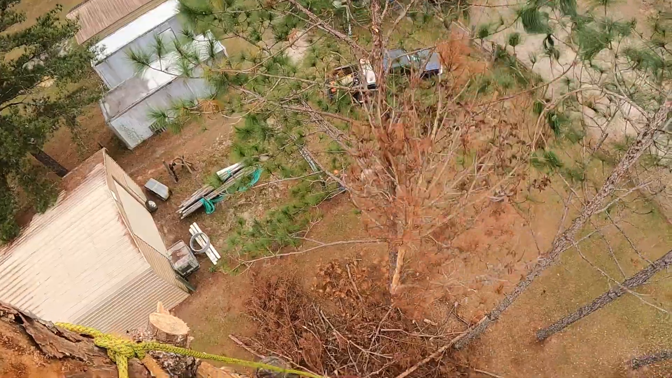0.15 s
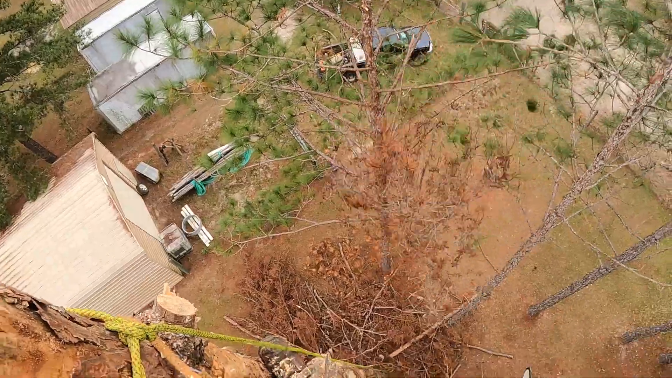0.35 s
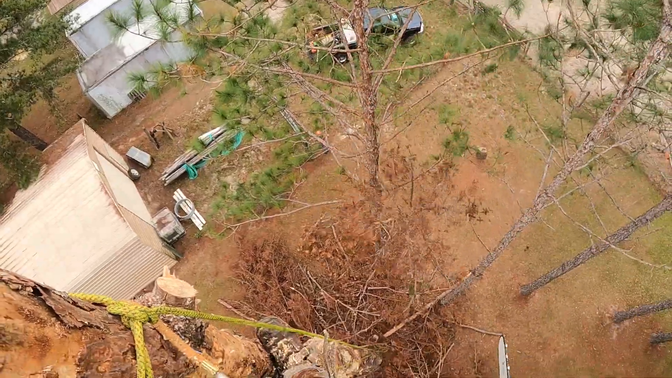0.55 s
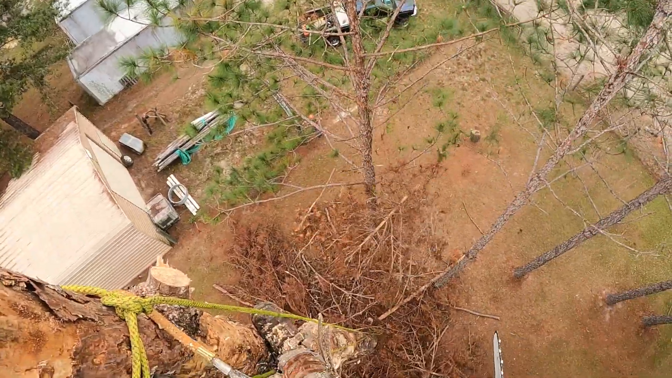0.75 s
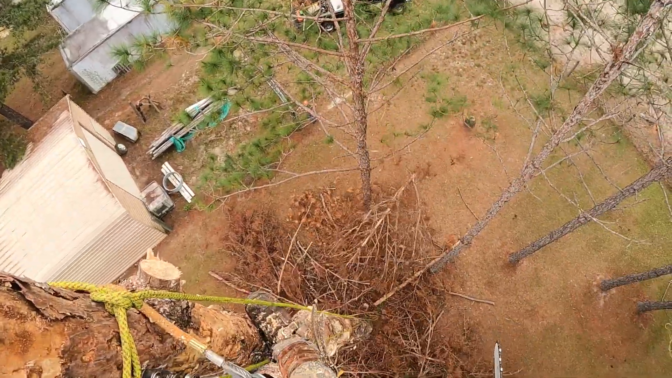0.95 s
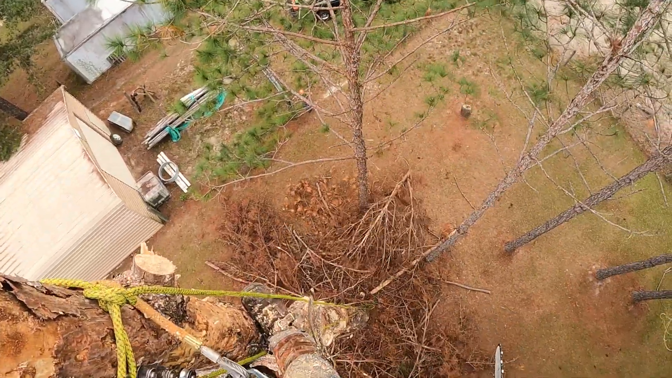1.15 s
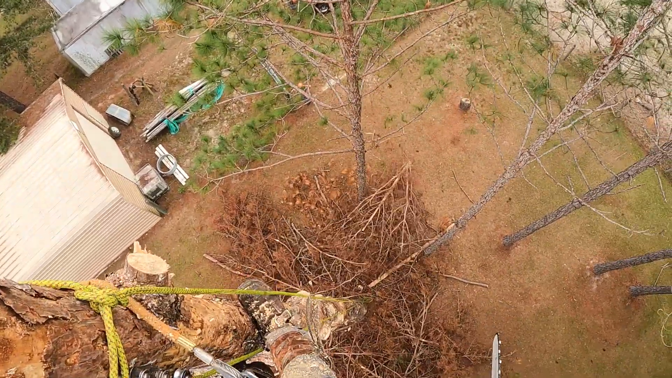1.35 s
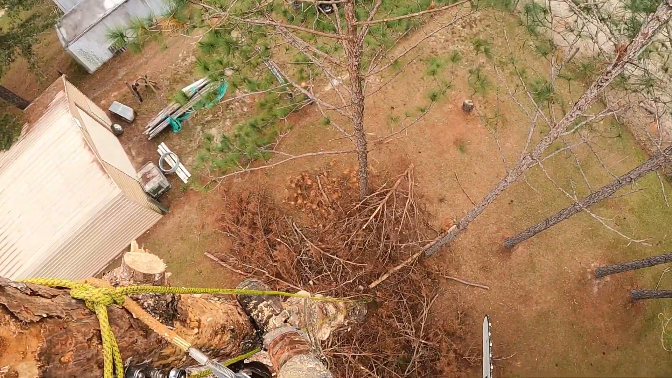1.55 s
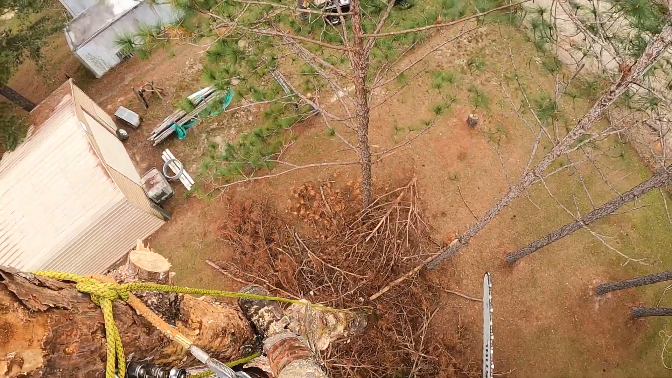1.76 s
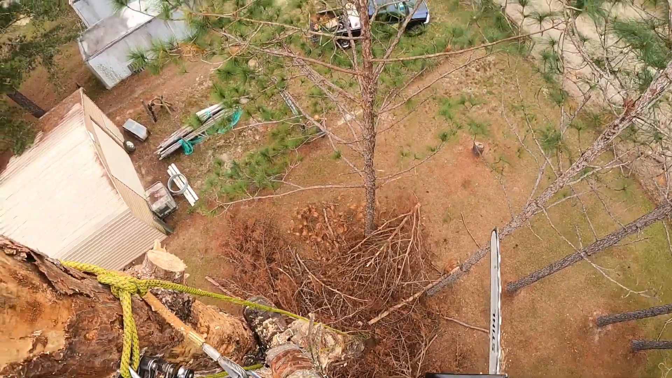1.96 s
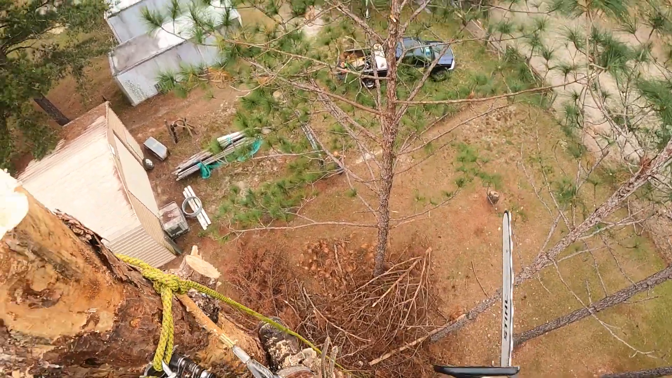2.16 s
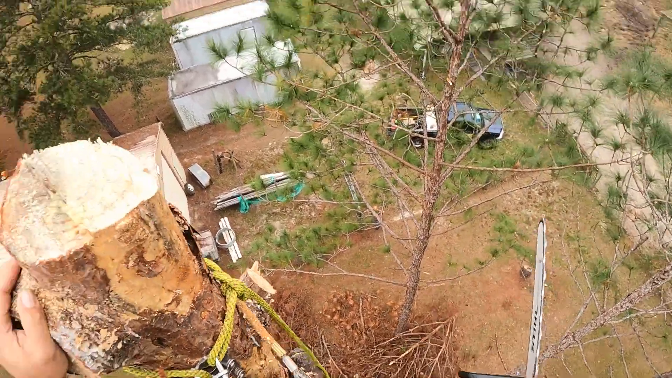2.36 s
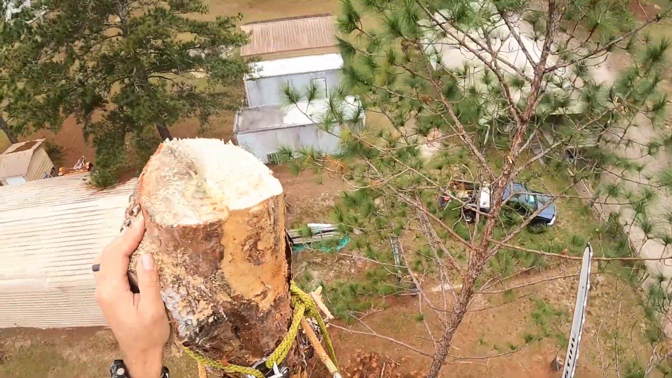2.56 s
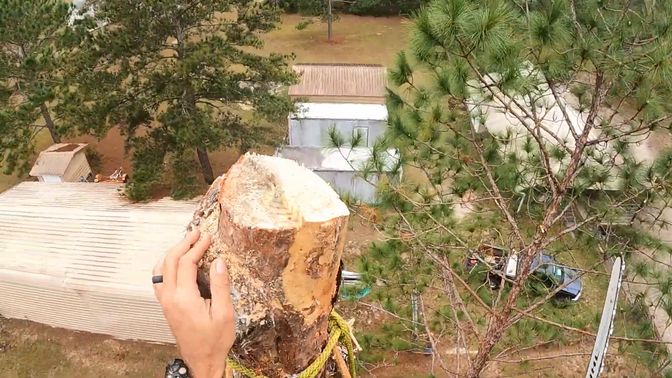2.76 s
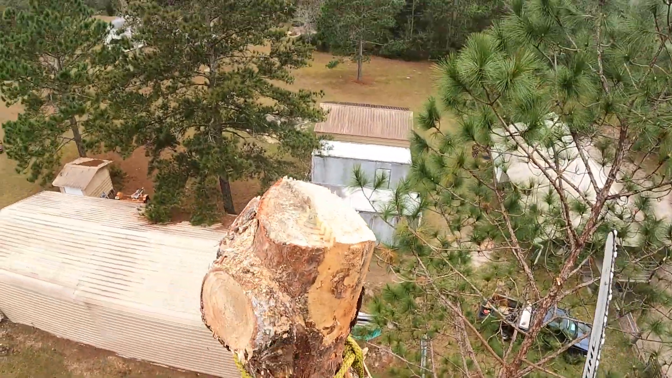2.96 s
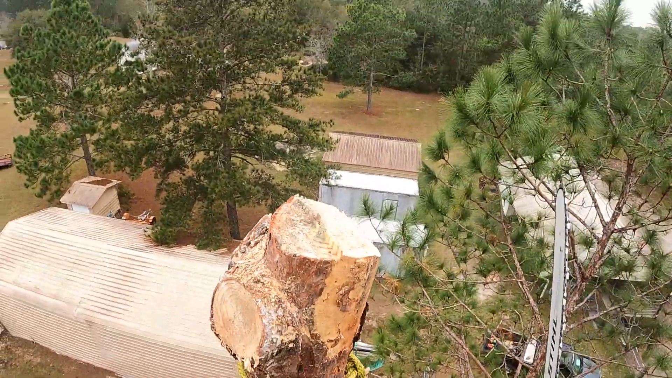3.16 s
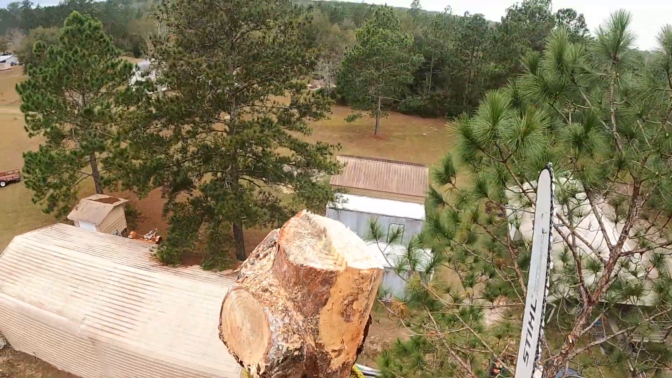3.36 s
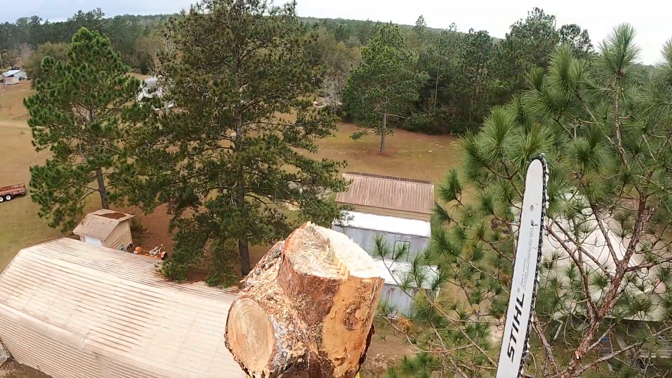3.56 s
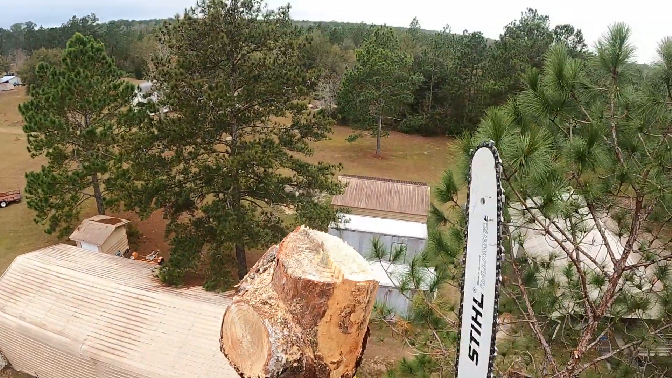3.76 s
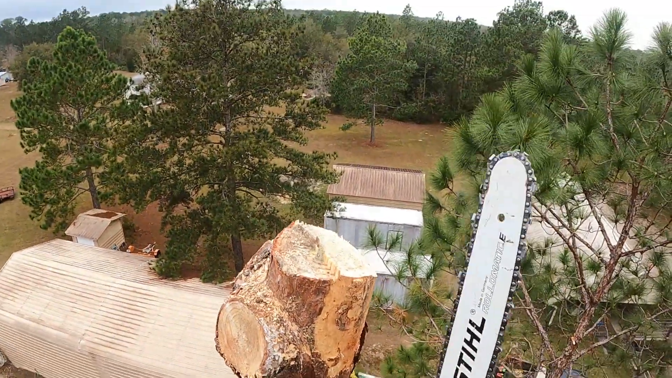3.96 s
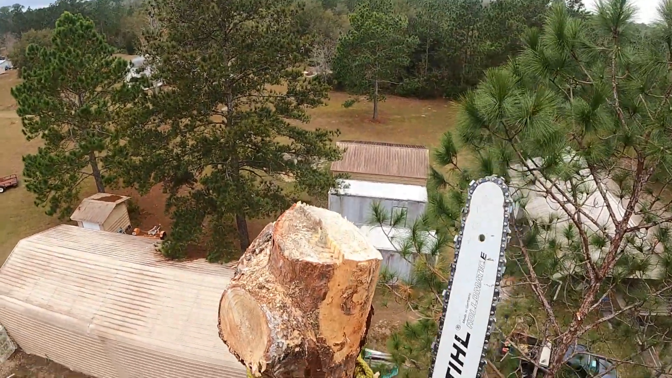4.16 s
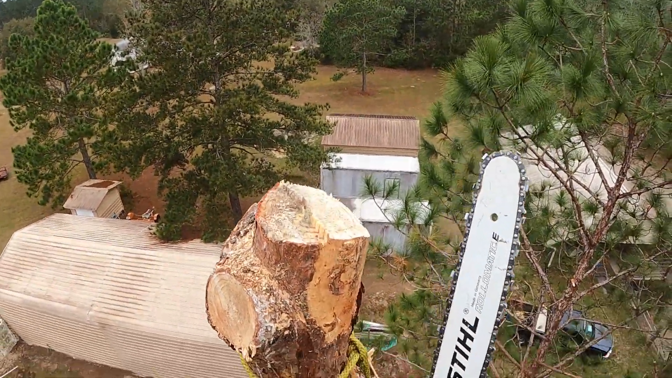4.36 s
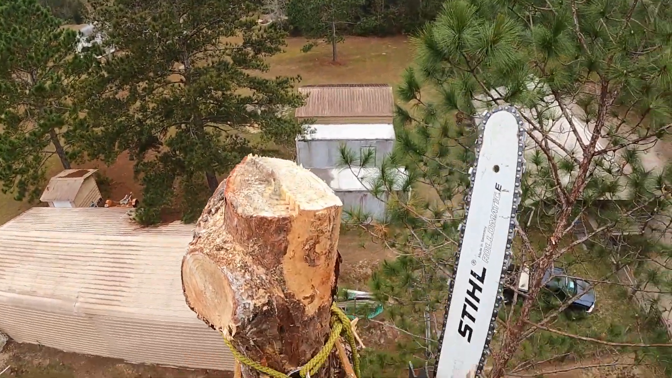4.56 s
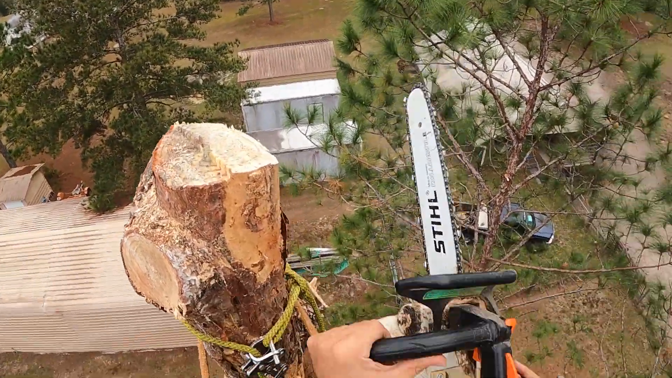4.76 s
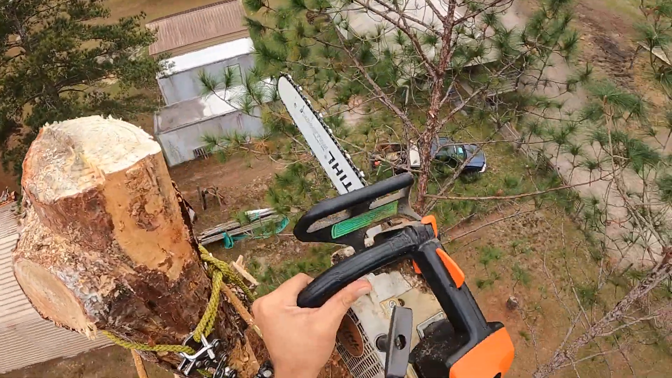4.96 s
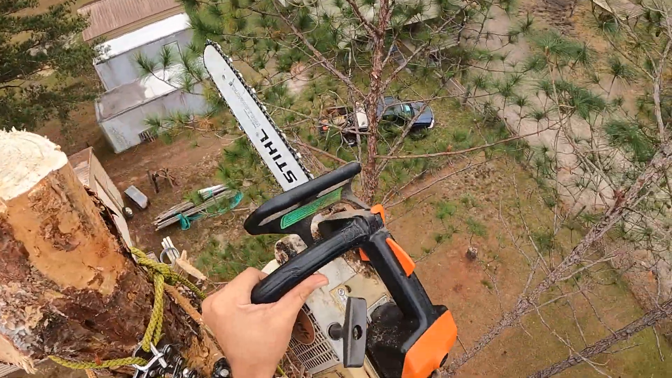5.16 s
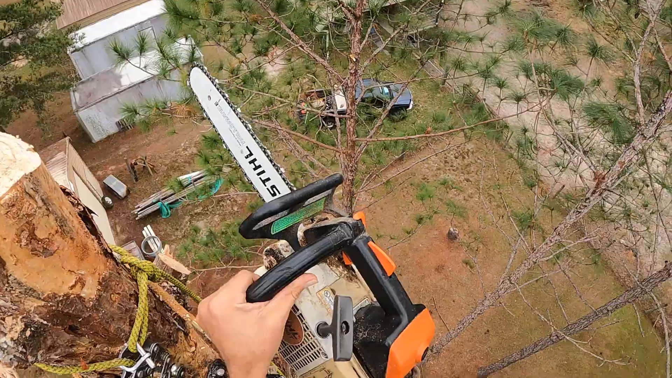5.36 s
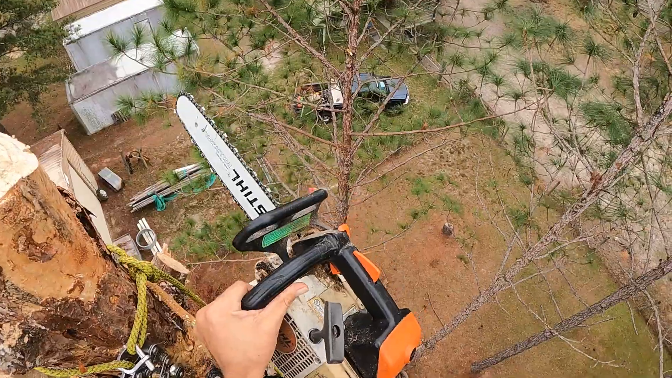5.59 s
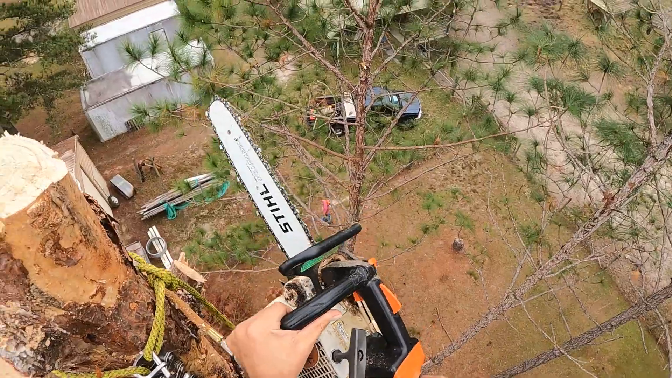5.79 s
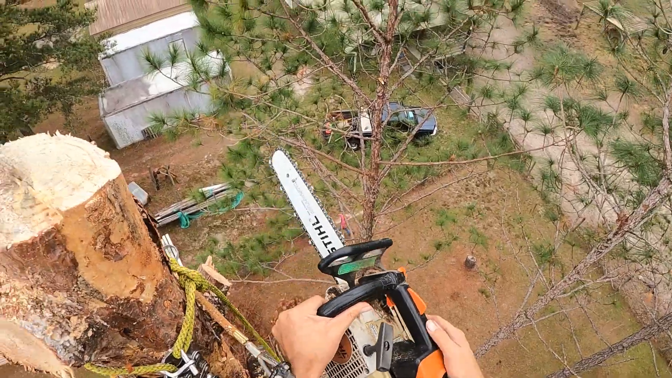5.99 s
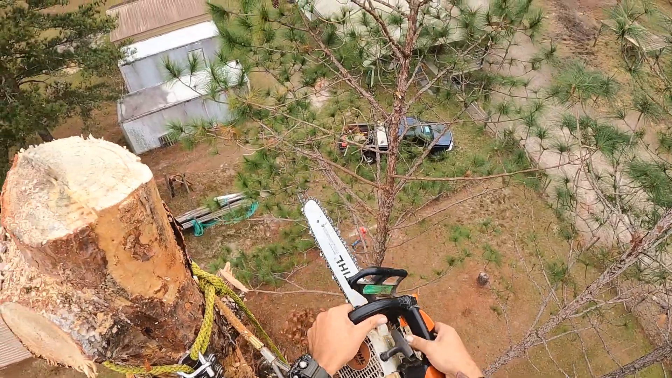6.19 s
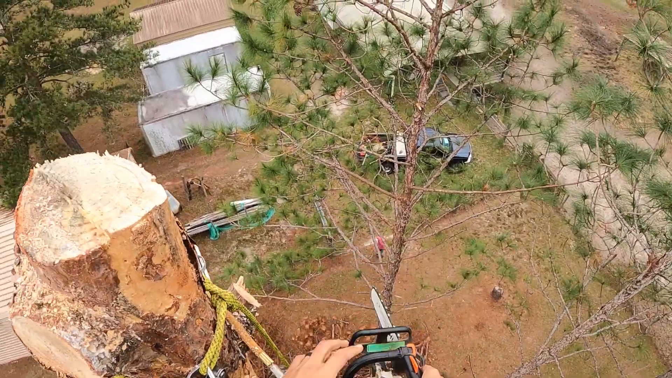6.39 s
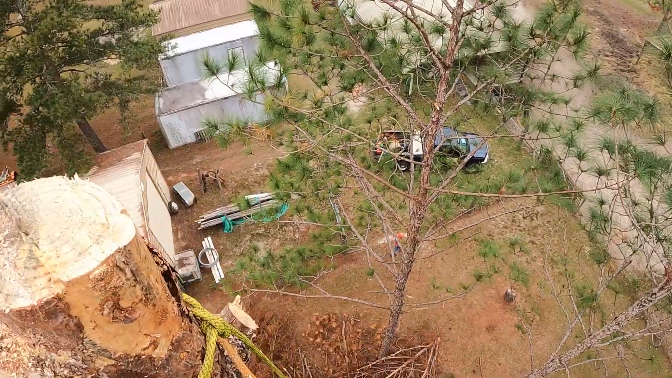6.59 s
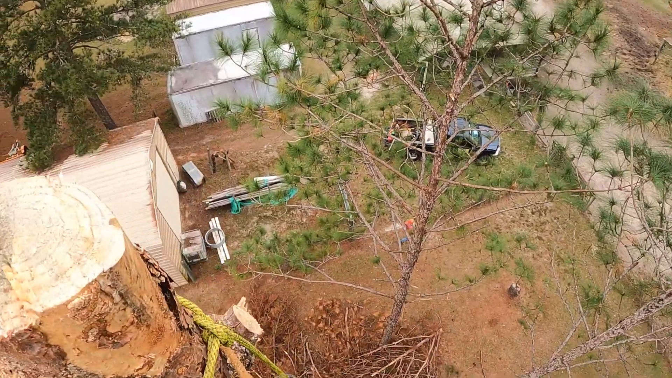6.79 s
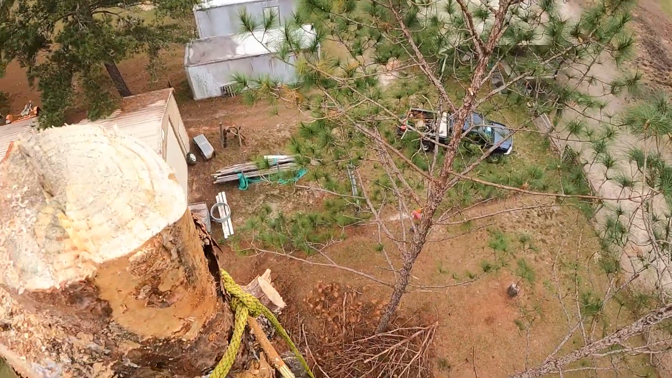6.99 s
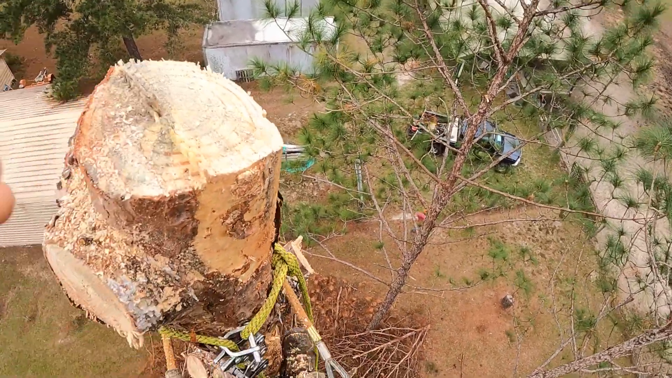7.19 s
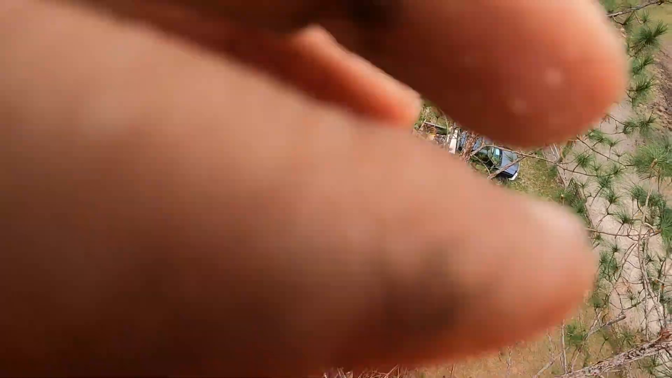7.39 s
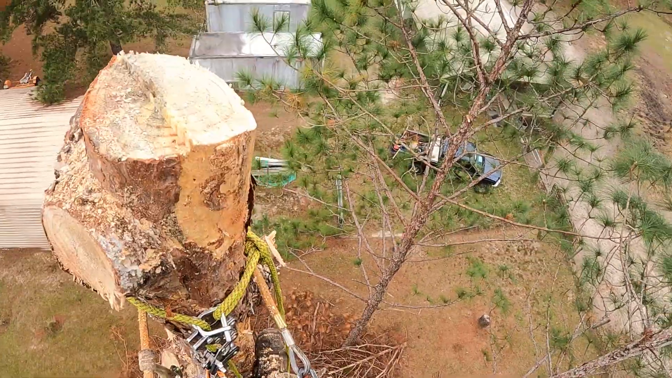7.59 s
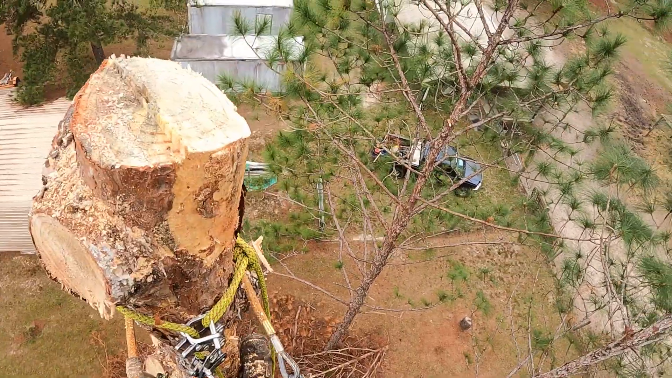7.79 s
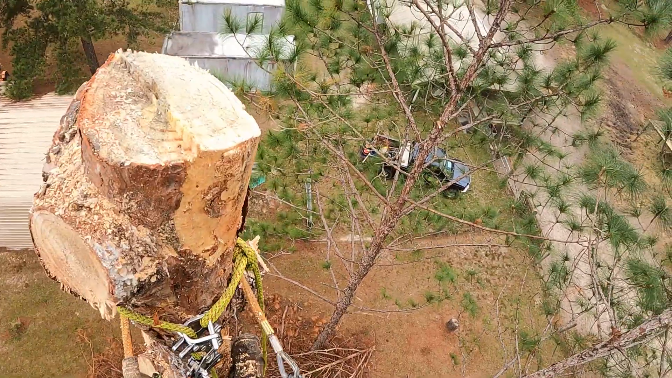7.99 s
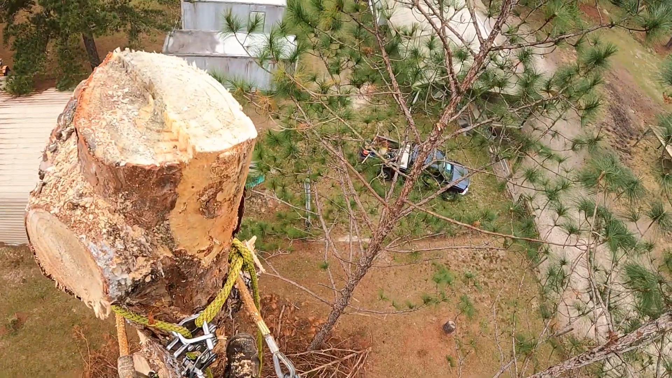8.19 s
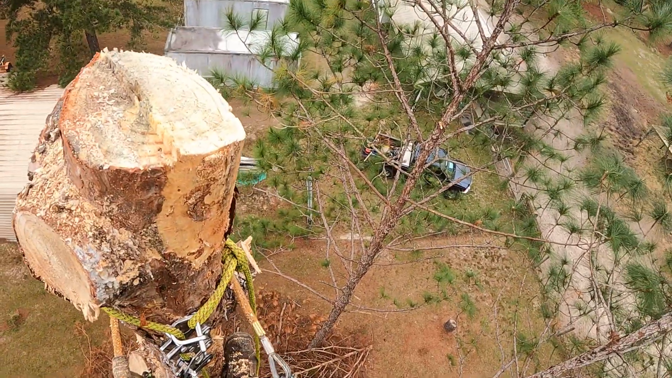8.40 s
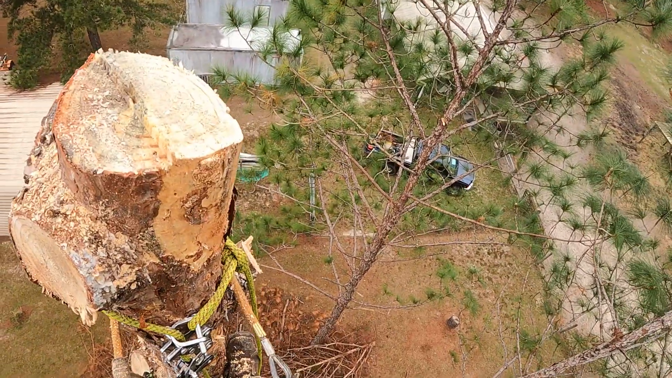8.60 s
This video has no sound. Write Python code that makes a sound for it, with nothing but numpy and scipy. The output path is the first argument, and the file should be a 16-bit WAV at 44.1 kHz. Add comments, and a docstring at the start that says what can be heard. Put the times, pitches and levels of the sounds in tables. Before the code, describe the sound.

A two-stroke chainsaw putters at idle while branches snap and crackle below, revs twice quickly, settles and cuts out, leaving wind, gear clinks and soft handling thumps.

```python
"""High in a pine a two-stroke chainsaw idles while the cut top crashes through branches below, over a far
outdoor murmur: puffs ring the muffler, noise bursts rattle, wooden notes snap over grainy crackle.
The throttle is blipped twice and the chain whirs; the engine settles, is switched off and clatters to a stop.
Then wind noise buffets the microphone, a clip and gear ring as struck metal, fingers thump and rub the
housing, the saw knocks on wood and a sleeve scrapes bark."""
import sys
import numpy as np
from scipy import signal
from scipy.fft import rfft, irfft, next_fast_len
from scipy.io import wavfile
from scipy.ndimage import uniform_filter1d

SR = 44100
rng = np.random.default_rng(int(sys.argv[2]) if len(sys.argv) > 2 else 0)


def put_to_file(sound):
    """Save the sound as 16-bit audio at rate SR, in the file named by the first command-line argument."""
    columns = np.atleast_2d(sound).T  # one column per channel
    safe = np.clip(columns, -1, 1)
    whole_steps = np.round(safe * 32767)
    wavfile.write(sys.argv[1], SR, whole_steps.astype(np.int16))


N = 381024

# All levels are relative; colours are spectral shapes.
# nominal crank speed: time_s, turns_per_s
CRANK_SPEED = [(0, 39), (.4, 41), (.9, 44), (1.25, 43), (1.35, 40.5), (2.01, 41), (2.13, 74), (2.2, 65),
               (2.29, 96), (2.35, 92.5), (2.49, 73.5), (2.63, 60.5), (2.78, 53), (3.0, 49), (3.3, 45.5),
               (3.9, 41), (4.28, 42), (4.35, 29), (4.4, 17), (4.6, 10)]
# marked turns at idle, most of them lit: time_s, bang_db
MARKED_TURNS = [(0.0162, -34), (0.0965, -16.5), (0.1477, -13), (0.226, -19), (0.299, -21), (0.3738, -15.5),
                (0.4459, -14), (0.516, -49), (0.5862, -13), (0.6791, -11), (0.798, -10.5), (0.8709, -14),
                (0.9387, -10.5), (1.0097, -10), (1.0779, -10), (1.17, -18), (1.2619, -13), (1.311, -17),
                (1.3896, -10), (1.4624, -38), (1.535, -18), (1.6054, -14), (1.6822, -9.5), (1.7525, -16),
                (1.8014, -14), (1.8768, -13), (1.9717, -12.5), (2.022, -12), (2.0461, -12), (2.7189, -12),
                (2.7749, -19), (2.8125, -11), (2.892, -9.5), (2.953, -21.5), (2.9925, -10.5), (3.0546, -16),
                (3.1171, -13.5), (3.161, -14.5), (3.206, -11.5), (3.2949, -10), (3.4044, -7.5),
                (3.492, -12.5), (3.5138, -11), (3.5861, -9), (3.6996, -7.5), (3.7931, -9.5),
                (3.8424, -10.5), (3.9179, -11), (3.9694, -10), (4.0435, -9.5), (4.1411, -8), (4.2137, -11)]
# turns with the ignition off: time_s, puff_offset_db, rattle_offset_db
LAST_TURNS = [(4.3727, -1.5, 8.5), (4.4318, -0.5, -4), (4.498, -9, -4.5), (4.5938, -26, -7.5)]
# trigger pulls: start_s, length_s, opening [0-1]
PULLS = [(2, 0.118, 0.9), (2.176, .105, 0.85)]
# loudness as the saw moves about: time_s, puff_db, rattle_db
NEARNESS = [(0, -17, -36), (.5, -13, -27), (1.2, -11, -27.5), (1.45, -16, -32), (1.9, -11, -27),
            (3.2, -8.5, -27.5), (3.8, -9, -28.5), (4.3, -9, -26.5)]
# bright crack of a firing: pitch_hz, level_db, t60_s
BANG_MODES = [(772, 5, 0.015), (2026, -7, 0.0073)]
# casing, struck by the piston every turn: pitch_hz, level_db, t60_s
CASING_MODES = [(1854, -6.5, 0.022), (2367, -10, 0.022), (5090, -16.5, 0.036)]
# intake drone, throttle shut: level_db of multiples 1-9 of crank speed
DRONE_DB = [-19.5, -17, -17, -8.5, -14.5, -25, -17, -20.5, -22]
# roar, throttle open: level_db of multiples 1-10 of crank speed
ROAR_DB = [1, -8.5, 0, -13, -9, -10, -19, -12, -15, -11.5]
# piston, clutch and chain rattle: freq_hz, level_db
RATTLE_COLOUR = [(250, 4.5), (800, -0.5), (1260, -10), (1770, -3), (3320, -13), (5000, -10), (5900, -19),
                 (6700, -19.5), (9700, -32.5), (11900, -32), (15500, -50)]
# chain whirring round the bar: freq_hz, level_db
CHAIN_COLOUR = [(650, -35), (1100, -4), (1410, 6.5), (2000, -7.5), (3600, -7), (4500, -4.5), (4950, 1.5),
                (5600, -11), (12000, -19), (15500, -43)]
# loose parts as the engine stops: time_s, level_db
CLATTERS = [(4.392, -29), (4.4706, -25), (4.5185, -47), (4.559, -53)]
# falling top sweeping through branches: time_s, level_db
BRUSH_LEVEL = [(0, -33.5), (.07, -45.5), (.28, -30), (.5, -35), (.82, -48), (1.02, -35), (1.12, -52),
               (1.35, -20.5), (1.52, -28), (1.6, -33.5), (1.8, -50)]
# branch crackle: freq_hz, level_db
BRUSH_COLOUR = [(410, -16), (700, -9), (2870, -8.5), (4890, -11), (12300, -29.5), (15500, -62)]
# branches snapping: time_s, level_db, pitch_hz
SNAPS = [(0.0202, 2.5, 1820), (0.1317, -9, 990), (.238, -13, 1700), (.253, -7.5, 1080),
         (0.2876, -2.5, 1700), (0.374, -7, 7400), (.43, -10.5, 1760), (0.4684, -5.5, 1480),
         (0.5154, -1, 4830), (0.739, -10, 1920), (0.787, -8.5, 2510), (0.807, -3.5, 3680),
         (1.026, -7.5, 3580), (1.388, -7, 2110), (1.4124, -9, 2200), (1.524, -17, 1280)]
# wind on the microphone: time_s, level_db, left_right_db
WIND_LEVEL = [(0, -46.5, 2), (4.4, -38, -9), (4.6, -49, 0.5), (5.25, -49, 5.5), (5.4, -33, -5),
              (5.85, -33.5, -6), (6.05, -29, -6.5), (6.27, -40, -2), (6.9, -46, 4), (7.25, -32, -1.5),
              (7.4, -41, -5), (7.55, -29, -9), (7.65, -45, 9), (7.8, -27.5, -6), (8.0, -46, -1),
              (8.25, -36, -1), (8.35, -50, -1)]
# wind rumble: freq_hz, level_db
GUST_COLOUR = [(12, -87), (25, 13.5), (60, 8), (100, 9.5), (200, -5.5), (400, -30), (1200, -65)]
# far murmur: time_s, level_db
FAR_LEVEL = [(4.6, -53), (7.65, -47), (8.64, -50.5)]
# far murmur: freq_hz, level_db
FAR_COLOUR = [(60, -31.5), (100, -6), (320, -17.5), (644, -19.5), (1060, -13.5), (1350, -21.5), (2020, -20),
              (2900, -32.5), (8000, -44.5), (10000, -54)]
# steel clip: pitch_hz, level_db, t60_s
CLIP_MODES = [(3960, -17, 0.15), (5518, -13, 0.12), (7149, -6, 0.24), (9440, -14, 0.1)]
# metal gear clinking: time_s, level_db, ring_offset_db
CLINKS = [(5.5786, -23, 0), (5.684, -20.5, -15), (5.727, -31.5, -25), (5.7835, -17, -3),
          (5.876, -32.5, -29), (6.061, -37.5, -17), (6.102, -21, -11), (6.568, -34, -36),
          (6.8335, -33.5, -28), (7.1721, -48, -32)]
# metal gear: pitch_hz, level_db, t60_s
GEAR_MODES = [(1950, -26, 0.04), (3800, -9, 0.03), (4230, -6, 0.028), (5850, -11, .025), (7300, -16, 0.06),
              (7960, -21, .07), (9600, -22, .05), (10400, -18, 0.06), (11460, -13, 0.04),
              (12450, -14, .035)]
# thumps on the housing: time_s, level_db, pitch_hz
THUMPS = [(5.931, -14, 82), (7.267, -17, 61.9), (7.4554, -9.5, 196), (7.546, -24, 61), (7.762, -21, 155),
          (7.833, -16, 61), (7.911, -18.5, 60), (8.028, -20.5, 108), (8.203, -19, 119)]
# finger strokes: start_s, length_s, level_db
STROKES = [(6.15, .085, -47), (7.155, .03, -46), (7.26, .04, -54), (7.452, .008, -25), (7.468, .022, -31),
           (7.494, .014, -29), (7.52, .025, -33), (7.462, .185, -39), (7.765, .06, -43), (7.855, .05, -45),
           (7.96, .05, -47), (8.02, .13, -51), (8.26, .075, -46)]
# skin on the housing: freq_hz, level_db
RUB_COLOUR = [(200, 6.5), (390, -6), (740, -8), (1220, -6), (2070, -11), (4570, -16), (6500, -21.5),
              (7600, -19), (8700, -27.5), (12100, -28.5), (15500, -51)]
# saw knocking on wood and harness: time_s, level_db, tick_offset_db
KNOCKS = [(6.024, -23.5, -15), (6.428, -29.5, -10), (6.763, -26.5, -13), (7.343, -31, -32),
          (8.208, -39.5, -14)]
# saw body: pitch_hz, level_db, t60_s
SAW_BODY_MODES = [(554, 8, 0.02), (780, 8, 0.018), (1114, 8, 0.018), (1400, 2, 0.015), (2200, -6, 0.012)]
# sleeve on bark: freq_hz, level_db
SCRAPE_COLOUR = [(300, -13.5), (1200, -11), (2400, -20), (9000, -52)]
# left-right likeness of airborne sound: freq_hz, likeness [0-1]
LIKENESS = [(60, 0.9), (640, 0.74), (3100, 0.83), (15000, 0.71)]
# left-right likeness of touch: freq_hz, likeness [0-1]
TOUCH_LIKENESS = [(300, 0.53), (1400, 0.71)]
# phase between the two ports: freq_hz, phase_rad
PORT_PHASE = [(100, -0.25), (700, 0.37), (3200, -0.82), (10000, 1)]

IDLE_HZ = 42
KICK_SHARE, KICK_T60_S = 0.062, 0.13  # each marked turn speeds the crank up for a few turns
TRIGGER_S, RELEASE_S = 0.0235, 0.034
STOP_S = 0.021  # the engine rattle fades this long after the last turn
PUFF_DB_PER_OCTAVE, RATTLE_DB_PER_OCTAVE = -9, -0.5  # with speed above idle
OPEN_PUFF_DB, OPEN_RATTLE_DB = 0.5, -10.5  # at full throttle
UNLIT_DB = -29  # bang of an unmarked turn at idle
# muffler ring of a cold puff at idle speed; speed and heat quicken it
RING_HZ, SWEEP_TURNS, SWEEP_S, RISE_S, DECAY_S = 173.4, 0.42, 0.0014, 0.0017, 0.0056
HOT_HASTE, HOT_SNAP = 1, 0.62  # burnt gas rings higher and bursts out more suddenly
MUFFLER_ECHO_S, MUFFLER_ECHO_DB = 0.0068, -16.5  # return from the far muffler wall
BARK_LEAD_S = 0.005  # combustion knocks the casing before the port opens
IDLE_DRONE, DRONE_PER_OCTAVE = 0.14, 0.26  # gains with the throttle shut
ROAR_GAIN_DB, ROAR_WAVER_DB, GULP_DB = -18, 1.2, -33  # unsteady burning; air into the open intake
RATTLE_LEAD_S, RATTLE_T60_S = 0.0075, 0.023  # the burst starts before the port opens
COAST_DB = -17  # loose parts jingle between turns
CHAIN_DB, CLUTCH_OCTAVES = -28, 0.18  # the clutch grips this far above idle
CHAIN_LAG_S, CHAIN_THROB = 0.066, 0.18  # slow to reach speed; jerks once a turn
BAR_HZ, BAR_T60_S, BAR_DB = 1470, 0.0051, -33  # the guide bar sings while the chain runs
WIDEN_S, WIDEN_DB = 0.00082, -18  # short delayed copy, opposite sign left and right, widens the engine
WOOD_CYCLES, WOOD_DB, SPLINTER_DB = 9.5, -2.5, -15.5
FAR_PAN_DB = 4
PING_S, PING_DB = 4.7885, -50
CHATTER_S = 0.005  # mean delay of a clink's one bounce
TOUCH_SHARE, LIFT_SHARE = 0.12, 0.79  # shares of a stroke's length; the lift is capped
SCRAPE_S, SCRAPE_DB, SCRAPE_T60_S = 7.158, -31, 0.33
STOPBAND_HZ = 15770


def amp(db):
    """Decibels to gain."""
    return 10 ** (np.asarray(db) / 20)


def rms_one(x):
    """Scale to rms 1."""
    return x / np.sqrt(np.mean(x ** 2) + 1e-20)


def in_time(rows, **outside):
    """Columns of a curve at every sample."""
    s, *columns = np.transpose(rows)
    return [np.interp(np.arange(N) / SR, s, c, **outside) for c in columns]


def at_hz(points, hz):
    """A spectrum read on a log-frequency axis."""
    freq_hz, value = np.transpose(points)
    return np.interp(np.log(hz), np.log(freq_hz), value)


def drift(rate_hz):
    """Slow random curve of rms 1, computed every 40 samples."""
    r = np.exp(-2 * np.pi * rate_hz * 40 / SR)
    white = rng.standard_normal(N // 40 + 2002)
    slow = signal.lfilter([1], [1, -2 * r, r * r], white)[2000:]
    return np.interp(np.arange(N) / 40, np.arange(len(slow)), rms_one(slow))


def swell(start_s, length_s, rise_s, fall_s):
    """Attack, hold, release; height 1."""
    corners_s = np.cumsum([start_s, rise_s, max(length_s - rise_s, 0), fall_s])
    return np.interp(np.arange(N) / SR, corners_s, [0, 1, 1, 0])


def clicks(seconds, gains):
    """A click train."""
    out = np.zeros(N)
    np.add.at(out, np.round(np.asarray(seconds) * SR).astype(int), gains)
    return out


def ring(x, hz, t60_s):
    """Two-pole resonator: a unit click sets a decaying sine ringing."""
    r, w = 1000 ** (-1 / (t60_s * SR)), 2 * np.pi * hz / SR
    return signal.lfilter([0, np.sin(w)], [1, -2 * r * np.cos(w), r * r], x + 1e-18)


def strike(seconds, db, modes, spread_db):
    """Every blow rings each mode with a strength of its own."""
    out = np.zeros(N)
    for hz, mode_db, t60_s in modes:
        luck_db = spread_db * rng.standard_normal(len(seconds))
        out += ring(clicks(seconds, amp(db + mode_db + luck_db)), hz, t60_s)
    return out


def puff(seconds, db, t60_s):
    """Envelope that jumps at each event and dies away."""
    return signal.lfilter([1], [1, -1000 ** (-1 / (t60_s * SR))], clicks(seconds, amp(db)) + 1e-18)


def noise(spectrum, likeness, grain_db=0.):
    """Stereo noise of a given colour and likeness, optionally grainy; rms 1."""
    size = next_fast_len(N)
    grains = amp(grain_db * np.minimum(rng.exponential(1, size), 5))
    mid, side = rfft(rng.standard_normal((2, size)) * grains)
    hz = np.arange(1, len(mid) + 1) * SR / size
    alike = np.clip(at_hz(likeness, hz), -1, 1)
    both = np.sqrt(1 + alike) * mid + np.sqrt(1 - alike) * side * [[1], [-1]]
    both = both * np.exp(.5j * at_hz(PORT_PHASE, hz) * [[1], [-1]])
    return rms_one(irfft(both * amp(at_hz(spectrum, hz)), size)[:, :N])


def pan(db):
    """Left and right gains for a level difference."""
    return amp(np.array([db / 2, -db / 2]).reshape(2, -1))


def crank():
    """Turns at every sample and port-opening times; whole numbers of turns lie between marked turns."""
    marked_s = np.array(MARKED_TURNS)[:, 0]
    speed_hz = in_time(CRANK_SPEED)[0] * (1 + KICK_SHARE * puff(marked_s, 0, KICK_T60_S))
    free = np.cumsum(speed_hz) / SR
    time_s = np.arange(N) / SR
    at_marks = np.interp(np.append(marked_s, np.array(LAST_TURNS)[:, 0]), time_s, free)
    turns = np.append(0, np.cumsum(np.round(np.diff(at_marks))))
    angle = np.interp(free, at_marks, turns)
    free_at_opening = np.interp(np.arange(turns[-1] + 1), turns, at_marks)
    return angle, np.interp(free_at_opening, free, time_s)


def exhaust_puffs(opens_s, gains, bangs):
    """Each puff rings the muffler at a falling pitch; quicker at speed, higher and sharper on a firing."""
    out, span_s = np.zeros(N + 2000), np.arange(2000) / SR
    haste = np.clip(1 / (IDLE_HZ * np.gradient(opens_s)), 1, 3)
    luck = rng.standard_normal((len(opens_s), 4))
    for when_s, gain, bang, quick, (a, b, c, d) in zip(opens_s, gains, bangs, haste, luck):
        heat = min(bang / gain, .6)
        steady = quick ** 3  # the flywheel evens out a fast crank
        t = span_s * quick ** 0.83 * (1 + HOT_HASTE * heat)
        cycles = RING_HZ * (1 + .03 * d / steady) * t
        cycles += (SWEEP_TURNS + .1 * a / steady) * (1 - np.exp(-t / SWEEP_S))
        rise = 1 - np.exp(-(t * (1 + HOT_SNAP * heat) / RISE_S) ** 2)
        shape = rise * np.exp(-t / (DECAY_S * quick ** 1.15))
        at = round((when_s - .002 + .003 * heat + .0005 * c / steady) * SR)
        out[at:at + len(t)] -= gain * amp(.7 * b + 4 * heat) * shape * np.sin(2 * np.pi * cycles)
    return out[:N] + amp(MUFFLER_ECHO_DB) * np.roll(out, round(MUFFLER_ECHO_S * SR))[:N]


def bang_cracks(opens_s, bang):
    """Combustion rings bright modes, before the port opens and as it opens."""
    bang_db = 20 * np.log10(bang + 1e-6)
    crack = strike(opens_s, bang_db - 15.5, BANG_MODES, spread_db=3)
    return strike(opens_s - BARK_LEAD_S, bang_db - 19, BANG_MODES[1:], spread_db=8) - crack


def intake(angle, throttle, octaves, running):
    """Crank-speed harmonics: a drone when shut, a wavering roar and rushing air when open."""
    drone = sum(amp(db) * np.sin(2 * np.pi * k * angle) for k, db in enumerate(DRONE_DB, 1))
    roar = np.zeros(N)
    for k, db in enumerate(ROAR_DB, 1):
        roar += amp(db + ROAR_GAIN_DB + ROAR_WAVER_DB * drift(30)) * np.sin(2 * np.pi * k * angle)
    gulp = amp(GULP_DB) * rms_one(ring(rng.standard_normal(N), 840, 0.0039))
    shut = running * (IDLE_DRONE + DRONE_PER_OCTAVE * octaves) * (1 - throttle)
    return shut * drone + throttle * (roar + gulp)


def rattle_bursts(opens_s, slap_db, rattle_db, running, throttle):
    """Noise bursts before each port opening; the gaps fill as the throttle opens."""
    burst = uniform_filter1d(puff(opens_s - RATTLE_LEAD_S, slap_db, RATTLE_T60_S), size=150)
    burst += 0.34 * running + 1.3 * throttle + amp(COAST_DB + 4.8 * drift(68))
    return amp(rattle_db) * burst * noise(RATTLE_COLOUR, LIKENESS, grain_db=4)


def chain_whir(angle, chain):
    """Grainy noise throbbing once a turn while the chain runs."""
    throb = 1 + CHAIN_THROB * np.cos(2 * np.pi * angle)
    return amp(CHAIN_DB) * throb * chain ** 0.44 * noise(CHAIN_COLOUR, LIKENESS, grain_db=3.5)


def engine():
    """One puff and rattle burst a turn, cracks on firings, intake, casing and chain."""
    angle, opens_s = crank()
    at = (opens_s * SR).astype(int)
    pulls = sum(wide * swell(s, length_s, TRIGGER_S, RELEASE_S) for s, length_s, wide in PULLS)
    throttle = np.clip(pulls, 0, 1)
    octaves = np.maximum(np.log2(in_time(CRANK_SPEED)[0] / IDLE_HZ), 0)
    off_s = LAST_TURNS[0][0] - STOP_S
    running = swell(0, off_s, 0, STOP_S)

    puff_db, rattle_db = in_time(NEARNESS)
    stopping = [(off_s, 0, 0)] + list(LAST_TURNS) + [(opens_s[-1] + STOP_S, -99, -60)]
    puff_offset_db, rattle_offset_db = in_time(stopping)
    puff_db = puff_db + PUFF_DB_PER_OCTAVE * octaves + OPEN_PUFF_DB * throttle + puff_offset_db
    rattle_db = rattle_db + RATTLE_DB_PER_OCTAVE * octaves + OPEN_RATTLE_DB * throttle + rattle_offset_db

    # a wide throttle fires every turn; marked turns have a bang of their own
    bang = amp(UNLIT_DB) + amp(5.5) * np.clip(throttle[at] - .55, 0, 1)
    for when_s, bang_db in MARKED_TURNS:
        bang[np.argmin(abs(opens_s - when_s))] = amp(bang_db)
    bang *= amp(puff_offset_db[at])

    slap_db = 1.56 * rng.standard_normal(len(opens_s)) + 30 * bang
    lagged = uniform_filter1d(np.roll(octaves, round(CHAIN_LAG_S * SR)), size=4000)
    chain = np.maximum(lagged - CLUTCH_OCTAVES, 0)
    clatter_s, clatter_db = np.transpose(CLATTERS)

    mono = exhaust_puffs(opens_s, amp(puff_db[at] + 5), bang * (1 - throttle[at]))
    mono += bang_cracks(opens_s, bang)
    mono += intake(angle, throttle, octaves, running)
    mono += strike(opens_s - RATTLE_LEAD_S / 2, slap_db + rattle_db[at] - 1, CASING_MODES, spread_db=5.5)
    mono += amp(BAR_DB) * np.sqrt(chain) * rms_one(ring(rng.standard_normal(N), BAR_HZ, BAR_T60_S))
    mono += strike(clatter_s, clatter_db - 2, CASING_MODES, spread_db=9)
    mono = signal.sosfilt(signal.butter(2, 70, "high", fs=SR, output="sos"), mono)

    rattle = rattle_bursts(opens_s, slap_db, rattle_db, running, throttle)
    rattle += chain_whir(angle, chain)
    rattle += puff(clatter_s, clatter_db - 14, 0.042) * noise(RATTLE_COLOUR, LIKENESS, grain_db=1)
    side = amp(WIDEN_DB) * np.roll(mono, round(WIDEN_S * SR)) * [[1], [-1]]
    return np.array([np.roll(mono, 1), mono]) + side + rattle  # left one sample late


def branches():
    """Dense twig crackle; each snap adds a short wooden note and a spray of splinters."""
    crackle = noise(BRUSH_COLOUR, LIKENESS, grain_db=4.5) * amp(3.84 * drift(25))
    snap_s, snap_db, _ = np.transpose(SNAPS)
    spray = puff(snap_s, snap_db + SPLINTER_DB, 0.016)
    wood = sum(ring(clicks([s], amp(db + WOOD_DB)), hz, WOOD_CYCLES / hz) for s, db, hz in SNAPS)
    return crackle * (amp(in_time(BRUSH_LEVEL, right=-99)[0]) + spray) + wood


def wind():
    """Lumpy low pressure on the microphone ports."""
    level_db, pan_db = in_time(WIND_LEVEL)
    return amp(level_db + 3.04 * drift(17.7)) * pan(pan_db) * noise(GUST_COLOUR, [(30, 1.0), (300, 0.86)])


def far_murmur():
    """Slowly wavering coloured noise, nearly mono in the bass."""
    level = amp(in_time(FAR_LEVEL)[0] + 1.2 * drift(4))
    return level * pan(FAR_PAN_DB) * noise(FAR_COLOUR, [(200, 1.0), (700, 0.77), (9000, 0.8)])


def clip_ping():
    """A steel clip rings faintly, once."""
    return strike([PING_S], PING_DB, CLIP_MODES, spread_db=2)


def contact_tick():
    """Grainy bright noise of hard contact, before its envelope."""
    colour = [(500, 4.5), (4000, 13.5), (7500, 4.5), (12000, -8), (15500, -24)]
    return noise(colour, LIKENESS, grain_db=7)


def gear_clinks(tick):
    """A short bright chatter, and metal modes struck twice as the gear bounces once."""
    s, db, ring_db = np.transpose(CLINKS)
    bounce_s = s + CHATTER_S * rng.uniform(.5, 1.5, len(s))
    ringing = sum(strike(hit_s, db + ring_db - 3, GEAR_MODES, spread_db=6.5) for hit_s in (s, bounce_s))
    return ringing + tick * uniform_filter1d(puff(s, db - 9, 0.041), size=120)


def fingers():
    """Skin stuttering over the housing, its colour shifting as it slips, and soft thumps through it."""
    pressure = np.zeros(N)
    for s, length_s, db in STROKES:
        lift_s = min(LIFT_SHARE * length_s, .015)
        pressure += amp(db) * swell(s, length_s, TOUCH_SHARE * length_s, lift_s) ** 2
    skin = noise(RUB_COLOUR, TOUCH_LIKENESS, grain_db=4.5)
    edges_hz = np.geomspace(100, 15500, 6)
    rub = np.zeros((2, N))
    for band_hz in zip(edges_hz, edges_hz[1:]):
        band = signal.butter(1, band_hz, "band", fs=SR, output="sos")
        rub += amp(2.6 * drift(45)) * signal.sosfilt(band, skin)
    thumps = sum(ring(clicks([s], amp(db)), hz, 0.047) for s, db, hz in THUMPS)
    return pressure * rub - thumps


def saw_knocks(tick):
    """Low body modes, dulled by a soft contact, and a weaker tick."""
    s, db, tick_db = np.transpose(KNOCKS)
    body = strike(s, db - 9, SAW_BODY_MODES, spread_db=4.5)
    body = signal.sosfilt(signal.butter(2, 3500, fs=SR, output="sos"), body)
    return body + tick * puff(s, db + tick_db, 0.024)


def sleeve():
    """A sleeve on bark: a dull, grainy scrape that dies away."""
    stroke = uniform_filter1d(puff([SCRAPE_S], SCRAPE_DB, SCRAPE_T60_S), size=400)
    return stroke * pan(FAR_PAN_DB) * noise(SCRAPE_COLOUR, TOUCH_LIKENESS, grain_db=3)


def scene():
    """All sources at the microphone."""
    tick = contact_tick()
    saw_and_air = engine() + branches() + wind() + far_murmur()
    handling = clip_ping() + gear_clinks(tick) + fingers() + saw_knocks(tick) + sleeve()
    return saw_and_air + handling


def record(dry):
    """Peaks are rounded, the top is cut."""
    rounded = 0.99 * np.tanh(dry / 0.86)
    return signal.sosfilt(signal.cheby2(12, 70, STOPBAND_HZ, fs=SR, output="sos"), rounded)


dry = scene()
out = record(dry)
put_to_file(out)
```